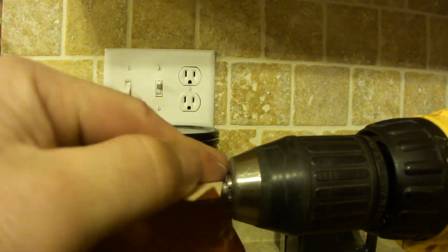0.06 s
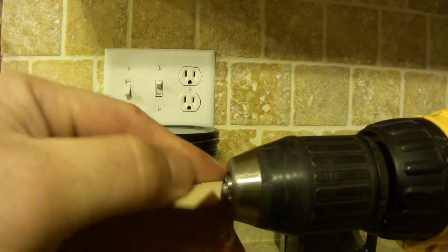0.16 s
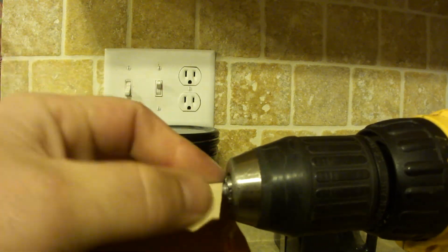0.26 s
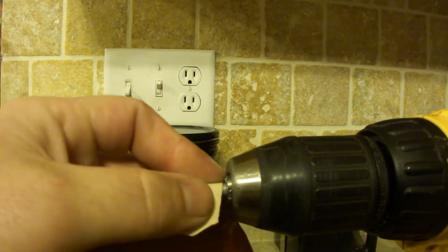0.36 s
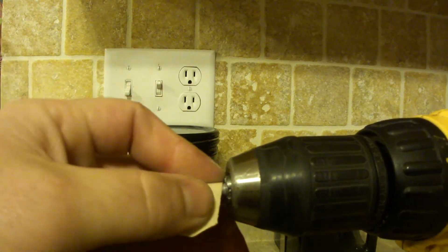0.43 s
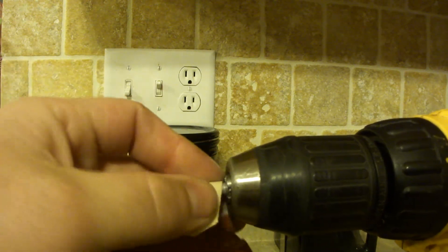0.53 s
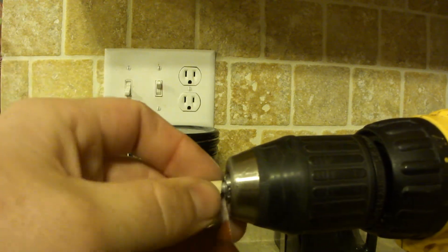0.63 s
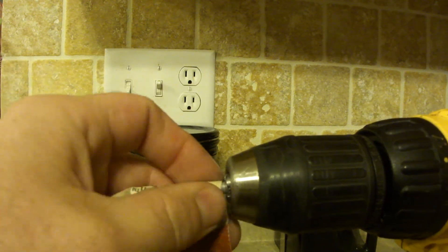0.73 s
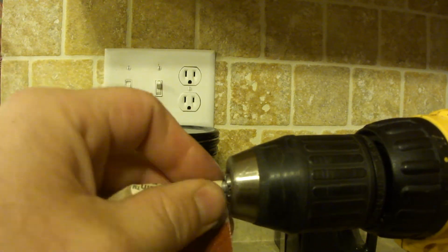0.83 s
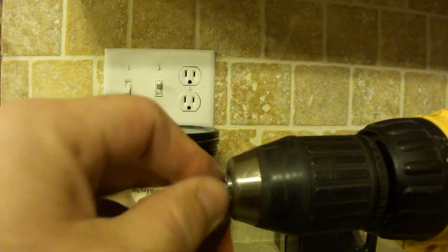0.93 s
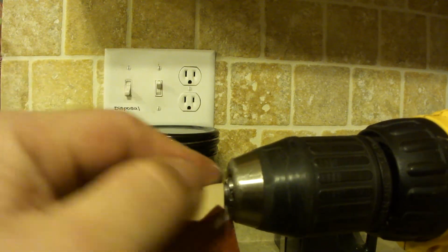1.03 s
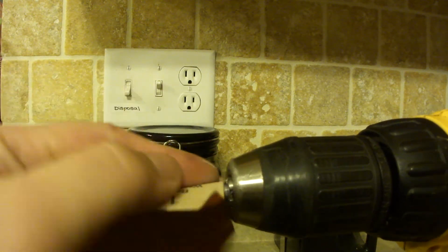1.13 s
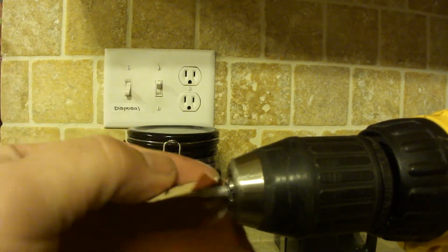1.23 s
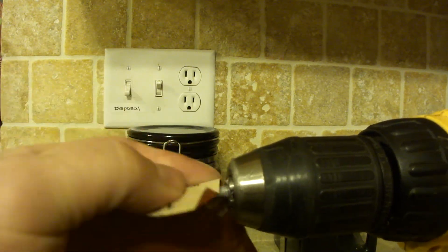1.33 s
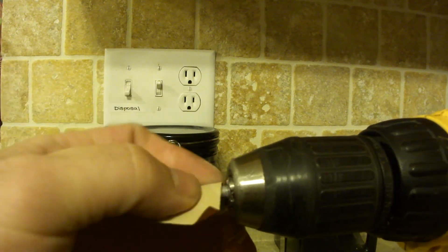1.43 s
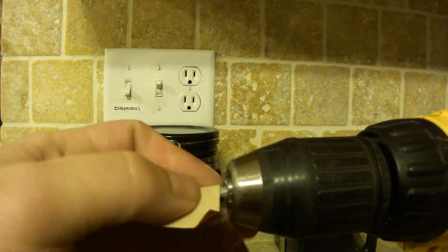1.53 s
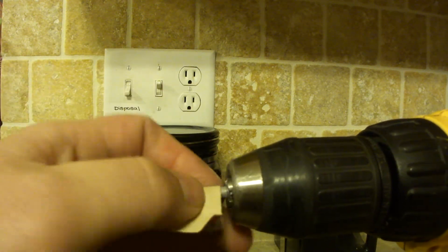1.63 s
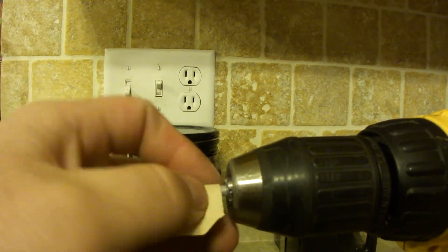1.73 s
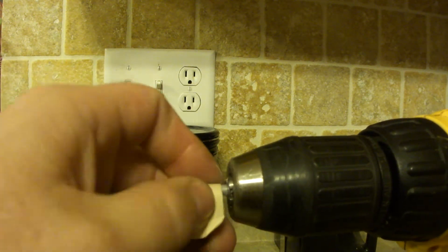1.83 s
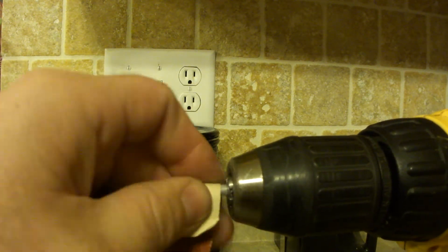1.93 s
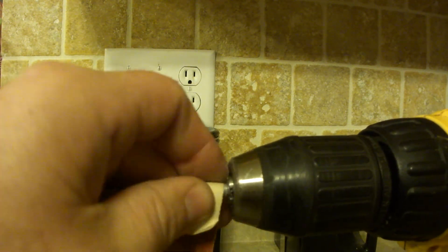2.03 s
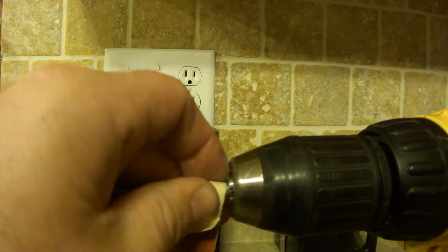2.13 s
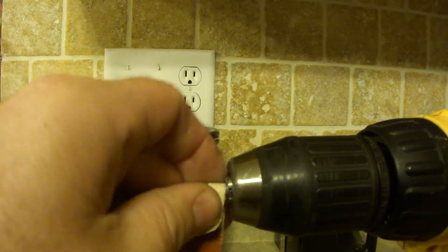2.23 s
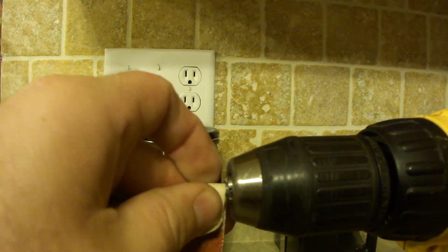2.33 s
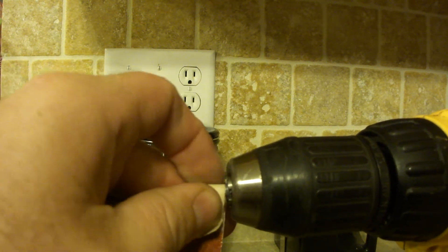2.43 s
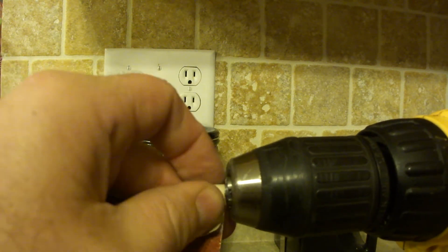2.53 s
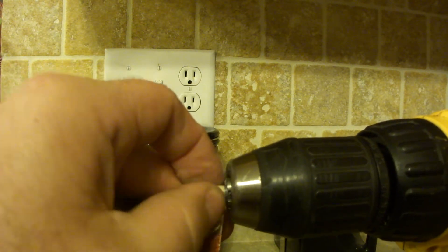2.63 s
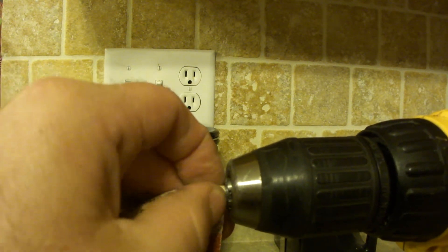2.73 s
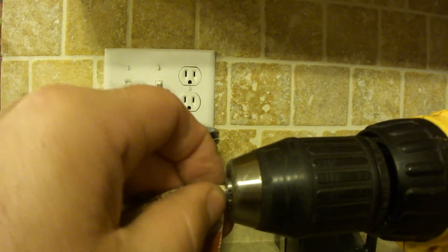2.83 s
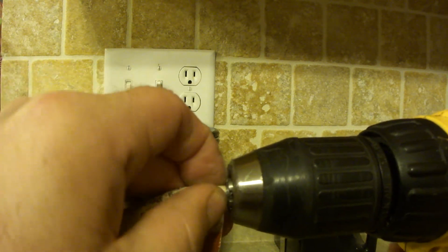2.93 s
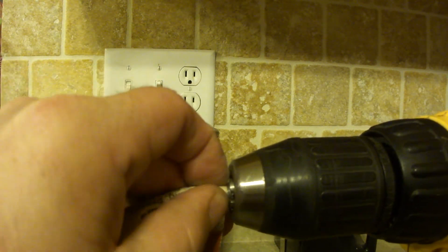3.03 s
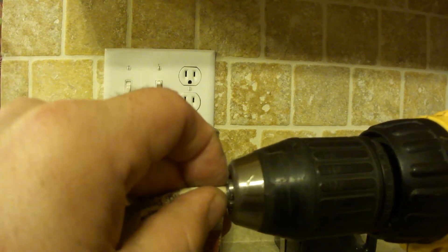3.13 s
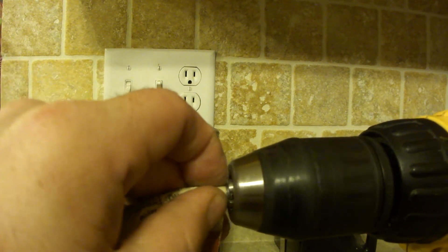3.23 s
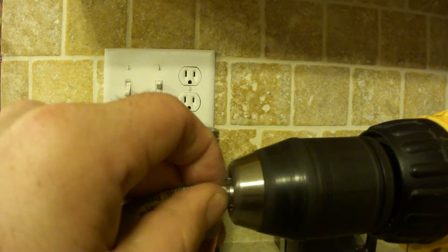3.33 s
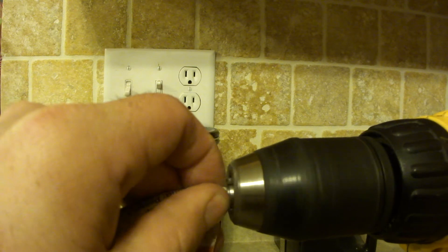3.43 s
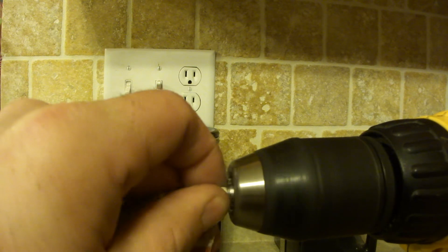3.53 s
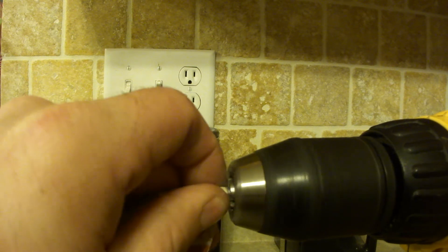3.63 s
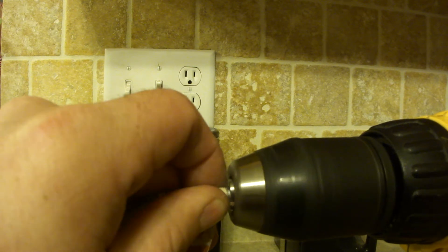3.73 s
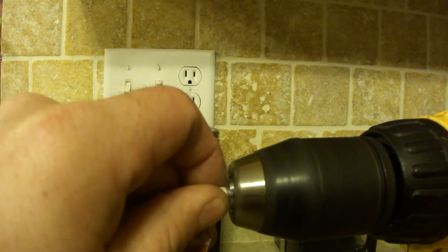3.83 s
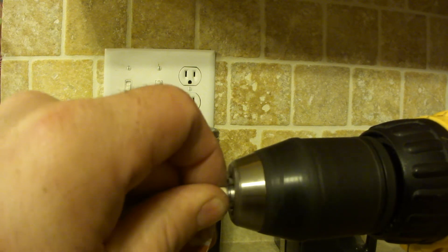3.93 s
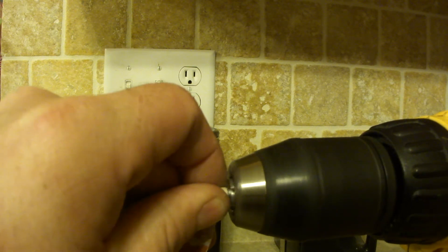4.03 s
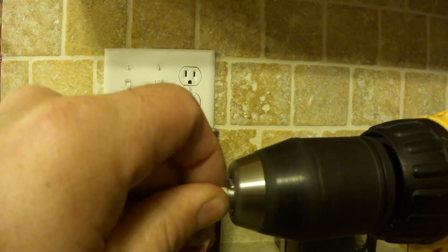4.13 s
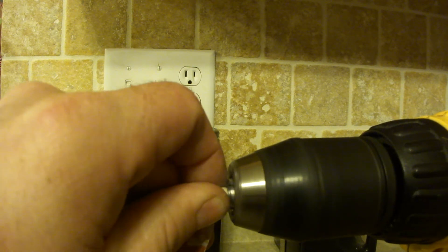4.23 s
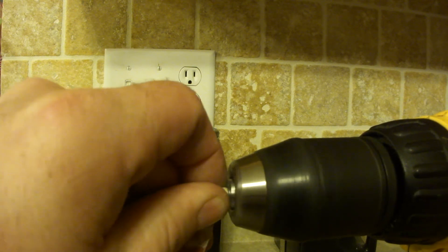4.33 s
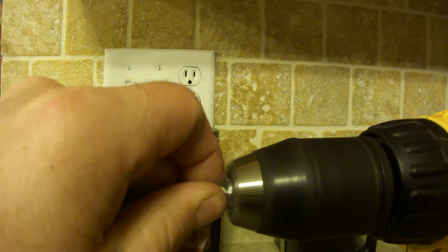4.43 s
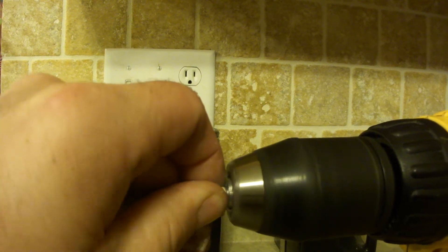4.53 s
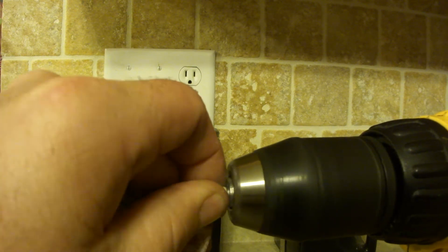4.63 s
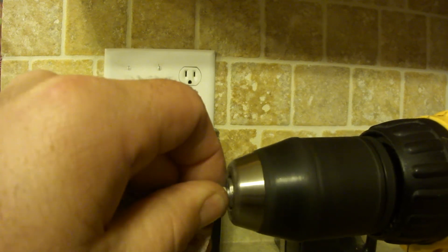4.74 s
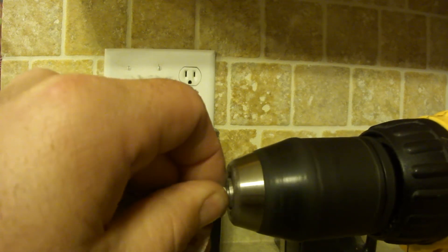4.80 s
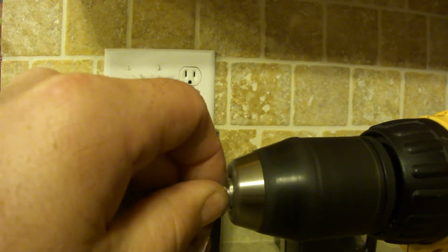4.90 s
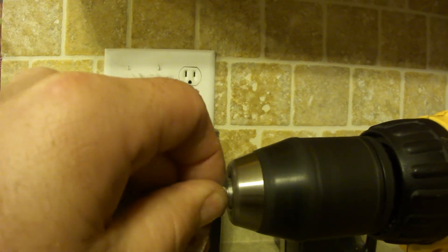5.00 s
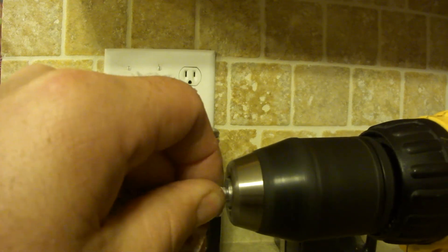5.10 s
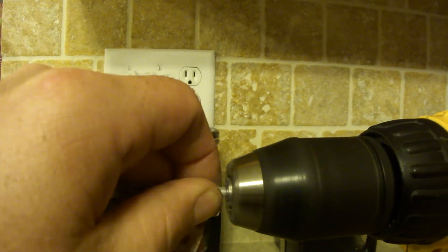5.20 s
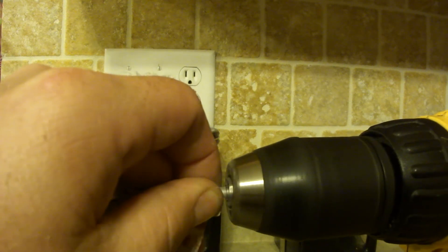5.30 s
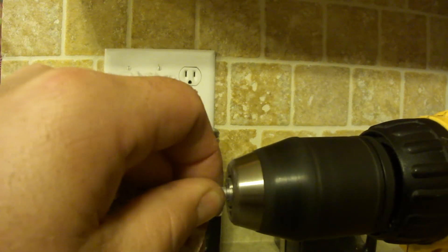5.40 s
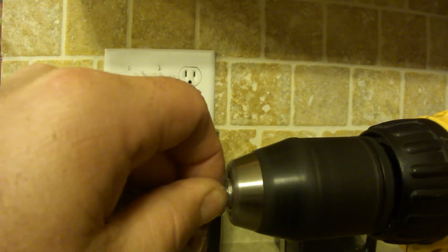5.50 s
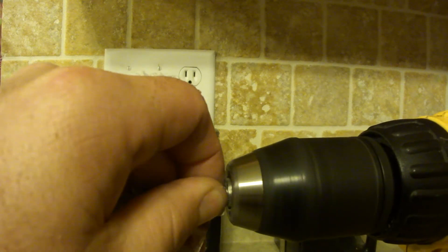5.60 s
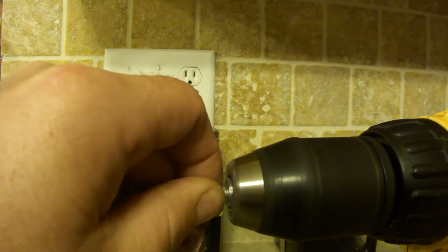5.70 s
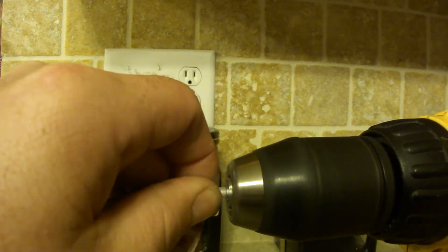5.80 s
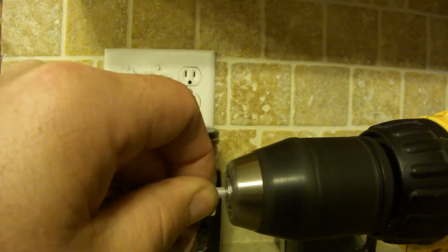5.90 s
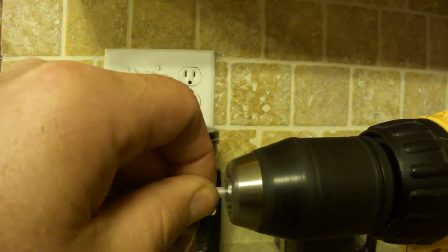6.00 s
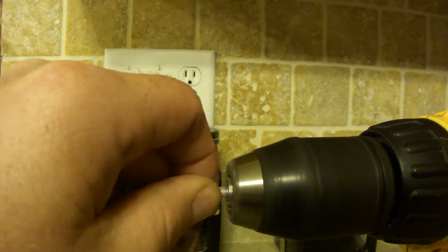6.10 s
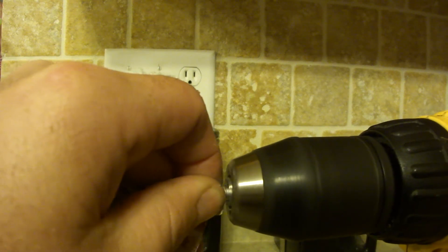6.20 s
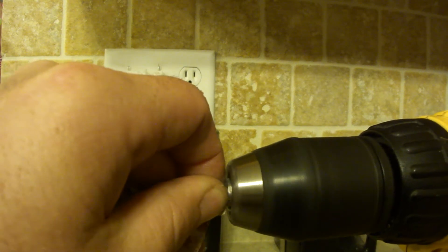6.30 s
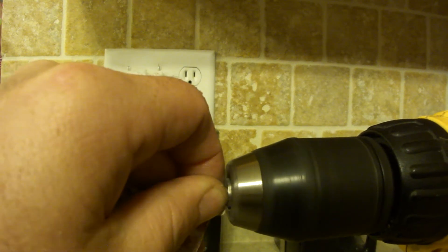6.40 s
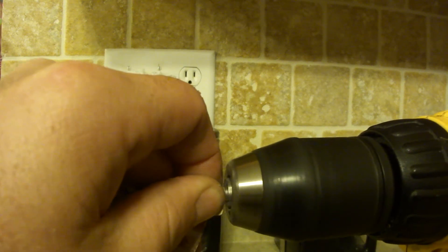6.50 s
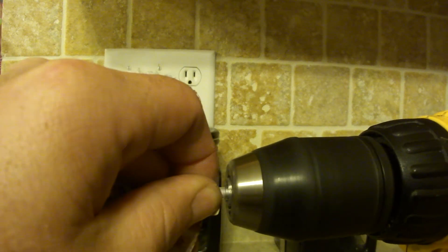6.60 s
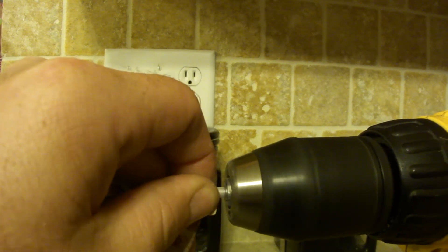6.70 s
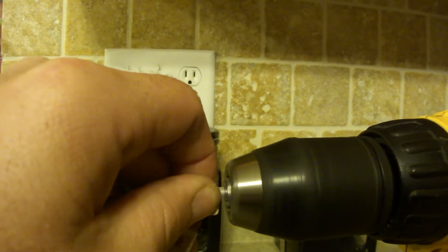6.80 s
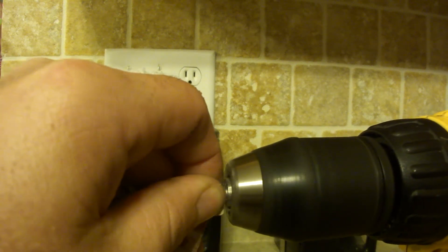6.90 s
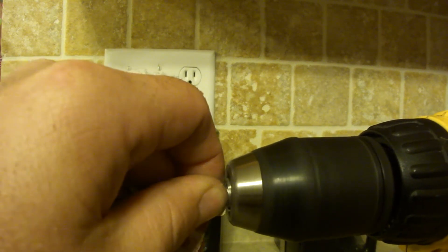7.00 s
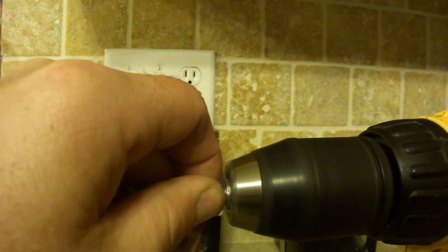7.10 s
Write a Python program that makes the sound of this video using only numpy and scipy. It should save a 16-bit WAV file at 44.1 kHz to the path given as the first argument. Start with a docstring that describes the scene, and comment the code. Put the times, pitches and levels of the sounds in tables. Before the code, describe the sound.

Close stereo pickup of quiet handling: gritty paper strokes and brittle ticks with a short hard-room answer. The handling thins out, then a few snaps lead into a drill trigger squeeze. The motor growls, rises in stages with thin squeals, and settles into a loud, buzzing whine with gearbox rattle and sandpaper hiss, slightly right, until the end.

```python
"""Sandpaper rubs and clicks close by on a tiled kitchen counter as fingers fold it round a plastic nock in a drill chuck.
Rubs and scrapes are noise that catches and lets go; each click is a noise crack over a ringing knock.
Then the trigger is squeezed in steps and the cordless drill whines up to full speed: sines follow the rotor as
singing gears, noise rattles in the gearbox, the nock hisses in the grit, and the brushes fizz in a fixed
pattern that repeats every two rotor turns. Soft air noise and an appliance drone lie underneath."""
import sys
import numpy as np
from scipy import signal
from scipy.fft import rfft, irfft, next_fast_len
from scipy.io import wavfile
from scipy.ndimage import map_coordinates

SR = 44100
rng = np.random.default_rng(int(sys.argv[2]) if len(sys.argv) > 2 else 0)


def inscribe(sig):
    """Save sig as 16-bit PCM at rate SR to the path in sys.argv[1].

    A 1-D sig is mono; a 2-D sig holds one channel per row.
    Samples are clipped to [-1, 1] before scaling.
    """
    pcm = np.round(np.clip(np.atleast_2d(sig).T, -1, 1) * 32767)
    wavfile.write(sys.argv[1], SR, pcm.astype(np.int16))


N = 315438
TIME = np.arange(N) / SR
KNOT_TIMES = TIME[::16]  # slow controls are computed every 16 samples

# Strokes of the sandpaper, the last as the nock starts to turn in it.
# Each row: start in seconds, length in seconds, dull rub in dB, gritty scrape in dB, both before the layer trims.
STROKES = [(0, 0.035, -50, -65), (.25, 0.057, -40.5, -50), (.441, 0.065, -44.5, -53.5),
           (0.568, 0.18, -47, -52.5), (0.794, 0.072, -46.5, -49.5), (0.911, 0.15, -45, -52.5),
           (1.111, .025, -48, -55), (1.214, 0.08, -39.5, -48.5), (1.34, 0.091, -39, -49.5),
           (1.486, 0.079, -41.5, -57), (1.696, 0.26, -42.5, -51.5), (1.991, 0.028, -46, -53),
           (2.246, 0.048, -47, -49.5), (2.522, 0.031, -48.5, -56), (2.657, 0.086, -55, -63),
           (2.849, 0.44, -50, -66), (3.287, 0.13, -35.5, -36.5)]
# Resonances of nock and chuck. Each row: centre in Hz, width in Hz, lift in dB.
NOCK_MODES = [(944, 49, 5.5), (1470, 100, 3), (2087, 58, 5), (2560, 49, 0.5)]
# Rotor speeds in turns a second: creep, half speed, flat out.
SPEED_STAGES = [117, 212, 380]
CREEP, FLAT_OUT = SPEED_STAGES[0], SPEED_STAGES[2]
# Each squeeze of the trigger sets a new speed that the rotor eases up to.
# Each row: start in seconds, aim in turns a second, time constant in seconds.
SQUEEZES = [(3.24, 90, .05), (3.428, 117.3, .076), (3.905, 227.7, .135), (4.318, 362.9, .14),
            (4.742, 383.5, .53)]
# Tones of gears and motor, the planet gears first. Overtones of the gear mesh ease off with speed, rotor tones grow.
# Each row: multiple of the rotor speed, level flat out in dB before shell and trim, growth in dB per octave of speed.
GEAR_ORDERS = [(.343, -55, 11), (1, -35.3, 32), (2.5, -25.8, 1.5), (3, -38, 20), (3.515, -37, 25),
               (4, -41, 3), (4.9, -32, 9), (5, -38, -3), (6, -29.5, 6.5), (6.3, -48, -2.5),
               (7.5, -52, -10.8), (10, -53, -5), (12, -40, 18), (12.5, -51, -2), (14, -49, 15),
               (15.5, -41.5, 15), (18, -39, 13), (19.5, -38.5, 16), (22, -38, 15), (23, -40, 15),
               (24, -34, 18)]
PLANET_ORDER = GEAR_ORDERS[0][0]
BITE_S = 0.12  # rise of rattle and hiss from standstill


def amp(db):
    """Decibels to gain."""
    return 10 ** (np.asarray(db) / 20)


def unit(x):
    """Scaled to rms 1."""
    return x / np.sqrt(np.mean(x ** 2) + 1e-20)


def along(points, hz):
    """(Hz, value) points read on a log frequency axis."""
    f, v = np.transpose(points)
    return np.interp(np.log(hz + 1), np.log(f + 1), v)


def curves(rows):
    """One value per sample for each column after the time."""
    s, *cols = np.transpose(rows)
    return [np.interp(TIME, s, c) for c in cols]


def wobble(rate):
    """A smooth random curve, rate knots a second."""
    knots = rng.standard_normal(int(N * rate / SR) + 4)
    return np.interp(TIME, KNOT_TIMES, map_coordinates(knots, [KNOT_TIMES * rate]))


def sine(turns):
    """A sine of a phase counted in whole turns."""
    return np.sin(2 * np.pi * turns)


def filtered(x, response):
    """x times a complex response of frequency."""
    m = next_fast_len(N + SR // 2)
    return irfft(rfft(x, m) * response(np.fft.rfftfreq(m, 1 / SR)), m)[..., :N]


def coloured(x, spectrum, size=1024):
    """x through a causal minimum-phase filter of unit energy, so the spectrum sets colour but not loudness."""
    cepstrum = irfft(np.log(amp(along(spectrum, np.fft.rfftfreq(size, 1 / SR)))))
    # folding the cepstrum forward in time makes the filter causal
    cepstrum[1:size // 2] *= 2
    cepstrum[size // 2 + 1:] = 0
    kernel = irfft(np.exp(rfft(cepstrum)))
    return signal.oaconvolve(x, kernel[None] / np.linalg.norm(kernel), axes=1)[:, :N]


def resonant(x, peaks):
    """x with bell-shaped lifts and dips, as a hollow body would add."""
    def response(hz):
        return amp(sum(db / (1 + (2 * (hz - centre) / width) ** 2) for centre, width, db in peaks))
    return filtered(x, response)


def noise_pair():
    """White noise left and right, alike in the bass and less so in the treble."""
    # Each row: frequency in Hz, left-right likeness from 0 to 1.
    likeness = [(60, 0.75), (400, 0.88), (1500, 0.86), (3000, 0.85), (8000, 0.64), (11000, 0.32)]
    m = next_fast_len(N, real=True)
    turn = np.arccos(np.clip(along(likeness, np.fft.rfftfreq(m, 1 / SR)), -1, 1)) / 2
    mid, side = irfft(rfft(rng.standard_normal((2, m))) * [np.cos(turn), np.sin(turn)], m)[:, :N]
    return np.array([mid + side, mid - side])


def room_tone(floor_db=-54):
    """Soft air noise and an appliance drone whose tones waver in level and phase."""
    # Colour of the air. Each row: frequency in Hz, relative level in dB.
    air_colour = [(30, -35), (70, -10), (130, -11.5), (220, -5.5), (350, -1), (500, -0.5), (800, -1),
                  (1300, -8.5), (2200, -11), (2700, -26), (4300, -36), (6000, -21), (8000, -18),
                  (11500, -34)]
    # Appliance hum. Each row: frequency in Hz, level in dB that random wavering then scales.
    hum_tones = [(355, -60), (770, -63)]
    drone = np.zeros(N)
    for hz, db in hum_tones:
        phase = 2 * np.pi * hz * TIME
        drone += amp(db) * (wobble(30) * np.sin(phase) + wobble(30) * np.cos(phase))
    return amp(floor_db) * coloured(noise_pair(), air_colour) + drone


def rubbing(body_db=-2.0, grit_db=0, catch_db=2, grain_db=3):
    """Each stroke rises, holds and dies away; grains catch and let go: a dull rub with gritty scrape above it."""
    # Colour of the dull rub. Each row: frequency in Hz, relative level in dB.
    rub_colour = [(35, -38), (70, -17.5), (150, -14), (280, 0), (600, -2.5), (1000, -0.5), (1500, 3),
                  (2300, -2.5), (2800, -18.5), (3700, -24.5), (5000, -57)]
    # Colour of the scrape. Each row: frequency in Hz, relative level in dB.
    scrape_colour = [(2500, -43), (3500, -13), (4500, -11.5), (5200, -6), (6200, 0), (8500, -1.5),
                     (10500, -8), (11600, -26)]
    attack_s, t60_s = 0.013, 0.17

    def held(start, length):
        rise = np.clip((TIME - start) / attack_s, 0, 1)
        return rise * amp(-60 * np.clip(TIME - start - length, 0, 1) / t60_s)

    # the fingers never quite rest until the paper is in place, at 2.15 s
    slides = [(0, 2.15, -53.5, -65.5), *STROKES]
    power = sum((amp([[rub], [scrape]]) * held(start, length)) ** 2 for start, length, rub, scrape in slides)
    rub_level, scrape_level = np.sqrt(power)
    catches = unit(amp(catch_db * wobble(140)))
    grains = unit(amp(grain_db * wobble(1300)))
    rub = amp(body_db) * coloured(noise_pair() * catches * rub_level, rub_colour)
    scrape = coloured(noise_pair() * catches * grains * scrape_level, scrape_colour)
    return rub + amp(grit_db) * scrape


def ticks(count=2, crack_db=5, knock_db=-2, spread_db=1):
    """Small snaps at random moments of every stroke, over its scrape and rub; each rings one nock resonance."""
    rows = []
    for start, length, rub, scrape in STROKES:
        for when, size, mode in rng.random((count, 3)):
            db = spread_db * (2 * size - 1)
            hz = NOCK_MODES[int(mode * len(NOCK_MODES))][0]
            rows.append((start + when * length, scrape + crack_db + db, rub + knock_db + db, hz))
    return rows


def clicks(crack_db=-3.0, knock_db=4, tone_db=3, crack_t60=0.0061, knock_t60=0.027, tone_t60=0.038,
           ring_db=-13, ring_t60=0.048, delay=0.00049, rise=0.00047):
    """A short crack over a duller knock, which rings at its own pitch."""
    # The loudest snaps of paper, nail and nock. Each row: start in seconds, before a shared delay,
    # crack in dB and knock in dB before the trims, ring in Hz.
    snaps = [(.1623, -37, -40.5, 345), (.261, -25, -37, 1530), (.395, -60, -36, 980),
             (.5028, -32, -41, 1310), (.569, -36, -38.5, 950), (.6259, -15.5, -41, 1560),
             (.6822, -19.5, -31.5, 1410), (.713, -39, -36.5, 2160), (.7918, -8, -23.5, 1320),
             (.937, -38, -25.5, 2550), (1.1344, -32, -31.5, 1010), (1.236, -27, -27.5, 1300),
             (1.2416, -26, -28.5, 1340), (1.2772, -25, -28.5, 2130), (1.3057, -30, -36, 1270),
             (1.351, -39, -36.5, 684), (1.604, -25, -36.5, 1830), (1.653, -34.5, -43, 277),
             (1.722, -48, -36.5, 1420), (1.7419, -37, -31.5, 1500), (1.7563, -39, -28.5, 2130),
             (1.8519, -23, -30, 780), (2.107, -35.5, -43, 950), (2.2624, -25.5, -44, 1330),
             (2.6735, -24, -46.5, 2150), (2.7048, -35, -51, 353), (2.8975, -28.5, -36, 820),
             (2.9587, -35, -43, 780), (3.114, -38.5, -42, 370), (3.1347, -38, -44, 820),
             (3.1917, -48, -44, 1460), (3.2219, -25.5, -37.5, 724), (3.3353, -16, -25.5, 870),
             (3.3712, -20, -34, 888), (3.4116, -13, -32, 860), (3.4442, -12.5, -35, 964)]
    # Colour of the knock. Each row: frequency in Hz, relative level in dB.
    knock_colour = [(60, -52), (200, -11.5), (600, -1.5), (1300, 3.5), (2000, 0), (2550, -0.5), (3000, -18),
                    (3700, -14), (5000, -26.5)]
    # Colour of the crack. Each row: frequency in Hz, relative level in dB.
    crack_colour = [(2500, -25), (4400, -24.5), (5400, -6.5), (6600, 1.5), (8000, -2), (10000, -6),
                    (11500, -17.5)]
    crack, knock, tone = np.zeros((3, N + SR))
    t = np.arange(SR // 8) / SR
    soft = 1 - np.exp(-t / rise)
    crack_decay = amp(-60 * t / crack_t60) + amp(ring_db - 60 * t / ring_t60)
    for s, top, low, hz in [*snaps, *ticks()]:
        first = round((s + delay) * SR)
        span = slice(first, first + len(t))
        crack[span] += amp(top + crack_db) * crack_decay
        knock[span] += amp(low + knock_db - 60 * t / knock_t60) * soft
        tone[span] += amp(low + tone_db - 60 * t / tone_t60) * soft * sine(hz * t)
    body = resonant(coloured(noise_pair() * knock[:N], knock_colour), NOCK_MODES)
    return coloured(noise_pair() * crack[:N], crack_colour) + body + tone[:N]


def bumps():
    """Flesh on plastic: a few low cycles that swell and fade."""
    # Soft bumps of the hand on the drill and of the drill in the hand.
    # Each row: centre in seconds, pitch in Hz, peak in dB, time from the peak to 1/e in seconds.
    thuds = [(0.513, 234, -43, 0.0067), (.604, 60, -62, .028), (0.624, 75, -56, .012),
             (0.716, 342, -37.5, 0.003), (1.545, 215, -49.5, .023), (2.904, 95, -61, .02),
             (3.269, 300, -33, 0.0053), (3.949, 730, -28.5, .02), (4.34, 85, -47, .015)]
    out = np.zeros(N)
    for s, hz, db, length in thuds:
        on = np.abs(TIME - s) < 3 * length
        t = TIME[on] - s
        out[on] += amp(db) * np.exp(-(t / length) ** 2) * sine(hz * t + rng.random())
    return out


def kitchen(x):
    """The tiled room's short answer: a noise tail, each frequency dying at its own speed."""
    # Each row: frequency in Hz, decay by 60 dB in seconds.
    decay_times = [(200, 0.79), (2000, 0.33), (10000, 0.13)]
    hz, t, z = signal.stft(rng.standard_normal((2, SR // 2)), SR, nperseg=256)
    decay = amp(-60 * t / along(decay_times, hz)[:, None])
    tail = signal.istft(z * decay, SR, nperseg=256)[1]
    return signal.fftconvolve(x, tail / np.linalg.norm(tail[0]), axes=1)[:, :N]


def squeal(jitter=0.94):
    """Each thin note swells and fades while its pitch glides and levels off, its phase shaking at random."""
    # Thin rising squeals as the trigger goes in and the motor takes up load.
    # Each row: start in seconds, length in seconds, first pitch in Hz, last pitch in Hz, peak in dB.
    notes = [(2.98, .15, 9800, 11200, -72), (3.03, .16, 7460, 8050, -61), (3.22, 0.12, 7060, 7200, -41),
             (3.47, 0.67, 7330, 7430, -38), (3.89, 0.087, 6600, 7350, -32), (3.95, .3, 7350, 7550, -34),
             (4.38, 0.23, 6340, 6700, -29), (4.95, .43, 8720, 8870, -24.5)]
    out, shake = np.zeros(N), jitter * wobble(200)
    for s, length, first_hz, last_hz, db in notes:
        on = (TIME > s) & (TIME < s + length)
        arc = np.pi * (TIME[on] - s) / length
        hz = first_hz + (last_hz - first_hz) * np.sin(arc / 2)
        phase = 2 * np.pi * np.cumsum(hz) / SR + shake[on]
        out[on] += amp(db) * np.sin(arc) * np.sin(phase)
    return out


def started(rise):
    """A gate that opens over rise seconds from the first squeeze."""
    return np.clip((TIME - SQUEEZES[0][0]) / rise, 0, 1)


def rotor(flutter=0.0005, hunting=0.0048, torque_lead_s=0.056):
    """Speed, turns made so far, and effort in octaves from flat out; a slow motor hunts more under the load."""
    # Speed won or lost as the grip changes. Each row: time in seconds, change in turns a second.
    grip_load = [(4.9, 0), (5.1, -1.1), (5.42, 1.8), (5.75, 0), (6.1, .8), (6.55, -1.2), (6.97, 1.5)]
    steady, surge, before = np.zeros(N), np.zeros(N), 0
    for s, aim, ease in SQUEEZES:
        to_go = (aim - before) * np.exp(-np.clip(TIME - s, 0, None) / ease)
        steady += aim - before - to_go
        surge += (TIME > s) * to_go / ease
        before = aim
    slow = np.clip(1 - steady / FLAT_OUT, 0, 1)
    unsteady = 1 + flutter * wobble(25) + hunting * slow * wobble(30.07)
    speed = (steady + curves(grip_load)[0]) * unsteady
    # while it speeds up, the motor works as hard as at the speed this far ahead
    effort = np.log2(np.maximum(steady + torque_lead_s * surge, 1) / FLAT_OUT)
    return speed, np.cumsum(speed) / SR, effort


def gearbox(speed, turns, effort, slow_db=-2, fast_db=-2.0, throb=0.11, lumps_db=1.06,
            rattle_db=-21.5, db_per_octave=4):
    """Loose teeth rattle in the housing, throbbing with the planet gears, louder with effort and changing in
    colour with speed."""
    # Colour at low speed. Each row: frequency in Hz, relative level in dB.
    slow_colour = [(30, -61), (70, -23.5), (130, -26), (220, -16), (400, -6), (650, -4), (850, 2),
                   (1100, -4), (1500, -3.5), (2200, -10), (2700, -25), (3500, -31), (5000, -34)]
    # Colour flat out. Each row: frequency in Hz, relative level in dB.
    fast_colour = [(30, -50), (70, -32.5), (160, -20), (240, -16.5), (400, -8.5), (470, -9), (550, -4.5),
                   (680, -4), (850, -2), (1300, 0), (1900, -4.5), (2400, -8), (2750, -23), (3700, -25),
                   (5000, -55)]
    level = amp(rattle_db + db_per_octave * effort + lumps_db * wobble(160)) * np.sqrt(started(BITE_S))
    teeth = level * (1 + throb * np.cos(2 * np.pi * PLANET_ORDER * turns))
    fast = np.clip((speed - CREEP) / (FLAT_OUT - CREEP), 0, 1)
    slow_part = amp(slow_db) * coloured(noise_pair() * teeth * np.sqrt(1 - fast), slow_colour)
    fast_part = amp(fast_db) * coloured(noise_pair() * teeth * np.sqrt(fast), fast_colour)
    return slow_part + fast_part


def hiss(speed, turns, effort, grit_db=0, brush_db=-8.0, throb=0.093, swell_db=-0.26, size=72,
         hiss_db=-23, db_per_octave=7.2):
    """Grit hisses on the spinning nock; the brushes add a scratch that repeats every two turns."""
    # Colour of brushes and grit. Each row: frequency in Hz, relative level in dB.
    hiss_colour = [(1500, -41), (3300, -22), (4100, -17.5), (4550, -2.5), (5100, -15.5), (5900, 3.5),
                   (6500, -1), (7500, 0), (8100, 1), (9600, 1.5), (10700, -6), (11600, -22)]
    level = amp(hiss_db + db_per_octave * effort + swell_db * wobble(12)) * started(BITE_S)
    pulse = 1 + throb * np.cos(2 * np.pi * turns) + throb * np.cos(2 * np.pi * PLANET_ORDER * turns)
    # one fixed scratch per side: equal harmonics in random phase, read by the rotor's position
    scratch = irfft(np.exp(2j * np.pi * rng.random((2, size))), size * size)
    cycle = np.arange(size * size) / size ** 2
    brushes = np.array([np.interp(turns / 2, cycle, s, period=1) for s in scratch])
    brushes = unit(coloured(brushes * amp(4.3 * wobble(24)), hiss_colour)) * turns.clip(0, 1)
    speed_share = (speed / FLAT_OUT) ** 2
    grit = amp(grit_db) * pulse * coloured(noise_pair(), hiss_colour)
    return level * (grit + amp(brush_db) * speed_share * brushes)


def whine(speed, turns, tone_db=0.04, waver_db=1.47, slip=0.23, settle=0.28):
    """Gear meshes and motor orders: each wavers in level and slips a little in phase with the backlash."""
    # How the shell passes the tones. Each row: frequency in Hz, gain in dB.
    shell = [(300, -5), (900, 0), (1500, 1.5), (2350, -1), (2800, -26), (3900, -30), (4600, -7),
             (5800, 1.5)]
    start_s, knot_s = 3.3, .02
    on = TIME > start_s
    t, out = TIME[on], np.zeros(N)
    knots = np.arange(start_s, t[-1] + knot_s, knot_s)
    knot_speed = np.interp(knots, TIME, speed)
    for order, db, growth in GEAR_ORDERS:
        waver, drift = rng.standard_normal((2, len(knots)))
        level = db + growth * np.log2(knot_speed / FLAT_OUT) + along(shell, order * knot_speed)
        gain = np.interp(t, knots, amp(level + tone_db + waver_db * waver))
        phase = 2 * np.pi * order * turns[on] + np.interp(t, knots, slip * drift)  # slip in radians
        out[on] += gain * np.sqrt(2) * np.sin(phase)
    return out * np.clip((TIME - start_s) / settle, 0, 1) ** 2


def placed(x, lag=2.2e-5):
    """The drill is louder on the right over most of its range and reaches the left lag seconds later."""
    # Each row: frequency in Hz, left minus right in dB.
    left_lean = [(400, 0.5), (1200, -0.5), (2400, -3.5), (5500, -1.5), (9000, -2.3), (11500, 0)]
    sides = np.array([[.5], [-.5]])

    def response(hz):
        return amp(sides * along(left_lean, hz)) * np.exp(-2j * np.pi * hz * lag * sides)
    return filtered(x, response)


def scene():
    """Handling with the kitchen's answer, then the drill; gear tones glide through the case's resonances."""
    # Peaks and dips of the hollow gear case. Each row: centre in Hz, width in Hz, lift in dB.
    gear_case = [(466, 29, -6), (680, 72, -5), (886, 76, -0.5), (1048, 24, -7), (1537, 81, 2),
                 (1756, 79, -2.5), (2080, 65, 1)]
    # Peaks and dips of the drill's shell. Each row: centre in Hz, width in Hz, lift in dB.
    drill_shell = [(5950, 100, -4.5), (7500, 130, 3.5), (8020, 320, -2), (8900, 100, -1.5), (9340, 130, 0),
                   (9940, 290, -1)]
    speed, turns, effort = rotor()
    gears = resonant(whine(speed, turns) + gearbox(speed, turns, effort), gear_case)
    friction = resonant(hiss(speed, turns, effort), drill_shell)
    drill = started(0.014) * (gears + friction) + squeal()
    hands = rubbing() + clicks() + bumps()
    return placed(drill) + hands + amp(-12.5) * kitchen(hands) + room_tone()


def record(dry, notch_width_hz=105, top_hz=11650):
    """Narrow notches cut slits in the treble, and the sound fades to nothing within 100 Hz above top_hz."""
    # Centres of the notches in Hz.
    notch_centres = [3000, 4000, 4930, 5060]

    def response(hz):
        notches = np.prod([1 - np.exp(-((hz - c) / notch_width_hz) ** 2) for c in notch_centres], axis=0)
        return notches * np.clip((top_hz - hz) / 100 + 1, 0, 1)
    return filtered(dry, response)


dry = scene()
out = record(dry)
inscribe(out)
```